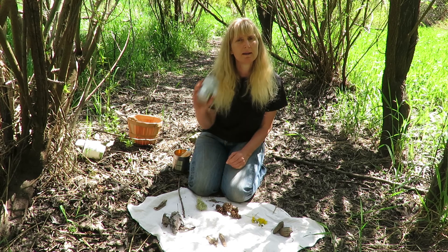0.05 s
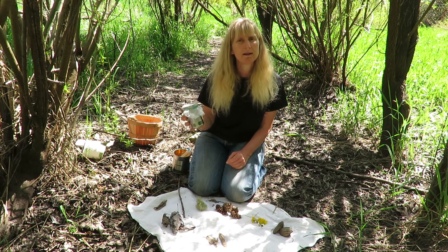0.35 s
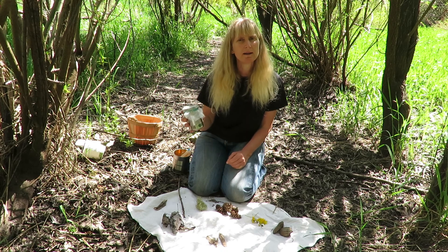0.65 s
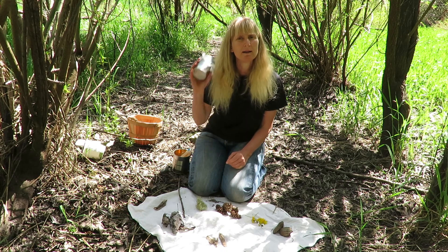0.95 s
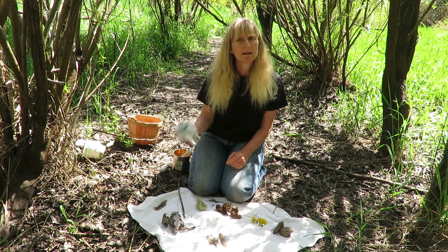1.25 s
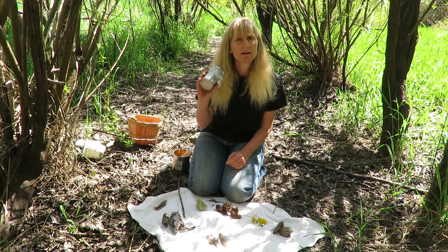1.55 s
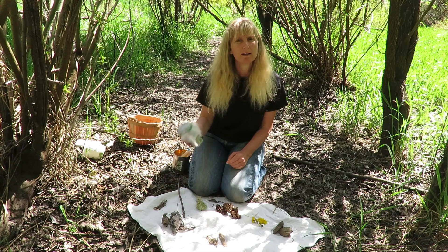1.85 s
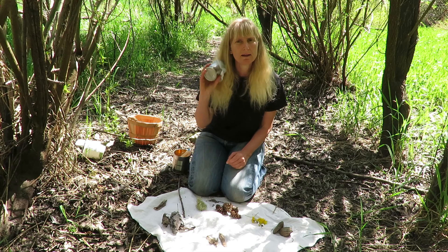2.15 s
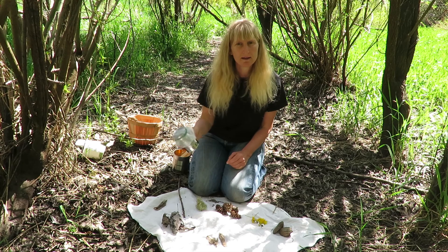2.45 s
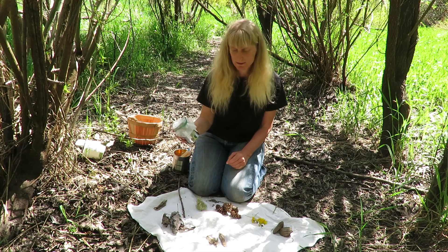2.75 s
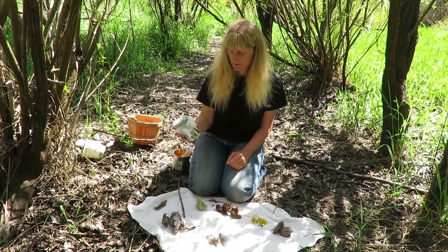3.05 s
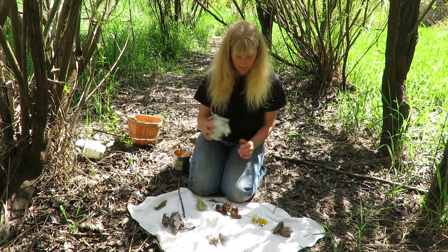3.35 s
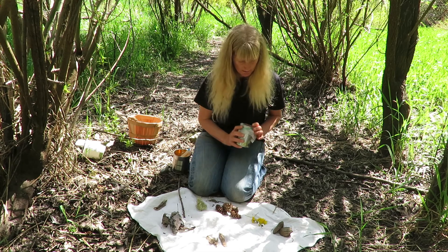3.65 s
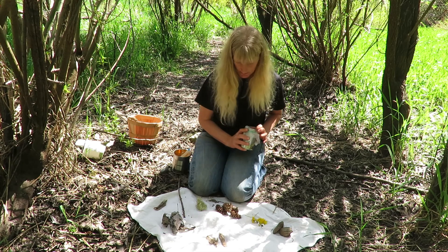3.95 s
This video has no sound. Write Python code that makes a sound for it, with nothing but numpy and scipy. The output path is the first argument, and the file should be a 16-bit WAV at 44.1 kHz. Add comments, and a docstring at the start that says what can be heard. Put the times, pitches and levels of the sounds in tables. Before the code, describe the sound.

Pebbles rattle in a small tin can, shaken four times with dry knocks and bright metallic clangs. After a short pause the can tips and they tumble softly. It sounds straight ahead, over faint outdoor air and insects.

```python
"""Faint outdoor air and insects sound throughout. From the start, a few pebbles are shaken four times
in a small tin can under trees: on each upstroke they slide and knock against the hand-damped lid, and
on each downstroke they hit the bare bottom, which clangs. Near 2.8 s the shaking stops. After a pause
the free hand takes hold of the can with a low bump, and from about 3.5 s the can is tipped, so the
pebbles tumble along its wall."""
import sys
import numpy as np
from scipy import signal
from scipy.fft import rfft, irfft, next_fast_len
from scipy.io import wavfile

SR = 44100
rng = np.random.default_rng(int(sys.argv[2]) if len(sys.argv) > 2 else 0)


def log_audio(samples):
    """Write samples as a 16-bit WAV file to the path given in sys.argv[1]."""
    # one column per channel
    frames = np.atleast_2d(samples).T
    # limit to full scale, then quantise
    limited = np.clip(frames, -1, 1)
    pcm = np.round(limited * 32767).astype(np.int16)
    wavfile.write(sys.argv[1], SR, pcm)


N = 176400
T = np.arange(SR // 3) / SR  # the clock of one hit [s]
# A "t60" or fade time is how long a sound takes to drop by 60 dB. Table levels are relative.
CLATTER_T60, BUZZ_T60, PING_T60 = 0.021, 0.046, 0.057
DETUNE, LIGHT_CHATTER = 0.0033, 0.14  # pitch spread between hits [fraction]; roughness of a tone


def amp(db):
    """Turn decibels into a gain."""
    return 10 ** (np.asarray(db) / 20)


def unit(x):
    """Scale a sound to an average power of 1."""
    return x / np.sqrt(np.mean(x ** 2) + 1e-20)


def struck(x):
    """Scale a hit so that its first 10 ms have a power of 1."""
    return x / np.sqrt(np.mean(x[:SR // 100] ** 2) + 1e-20)


def fade(t60):
    """The way a hit dies down."""
    return np.exp(-np.log(1000) * T / t60)


def along(points, hz):
    """Read between (frequency, value) points on a log frequency scale."""
    f, v = np.transpose(points)
    return np.interp(np.log(hz + 1), np.log(f + 1), v)


def add(track, start_s, x):
    """Mix a sound into a track."""
    i = max(0, round(start_s * SR))
    track[i:i + len(x)] += x[:max(0, N - i)]


def coloured(x, colour):
    """Give a sound a tone colour: some frequencies stronger, others weaker."""
    size = 2 * next_fast_len(N // 2 + SR // 4)
    gain = unit(amp(along(colour, np.fft.rfftfreq(size, 1 / SR))))
    cepstrum = irfft(np.log(gain))
    cepstrum[1:size // 2] *= 2  # folded forward, so nothing sounds before its hit
    cepstrum[size // 2 + 1:] = 0
    return irfft(rfft(x, size) * np.exp(rfft(cepstrum)), size)[..., :N]


def resonant(x, tones):
    """Let a sound set off ringing tones, each given as (pitch [Hz], width [Hz], level [dB])."""
    size = 2 * next_fast_len(N // 2 + SR // 4)
    f = np.fft.rfftfreq(size, 1 / SR)
    gain = sum((-1) ** k * amp(db) * 1j * f * width / (hz * hz - f * f + 1j * f * width)
               for k, (hz, width, db) in enumerate(tones))
    return irfft(rfft(x, size) * gain / np.sqrt(np.mean(np.abs(gain) ** 2)), size)[:N]


def ring(tones, detune=DETUNE, attack_s=0.00044, chatter=0.42):
    """Fading tones; where the pebbles lie shifts pitch and level, and their chatter adds roughness."""
    hz, db, t60 = np.transpose(tones)[:, :, None]
    shift, level, phase = rng.standard_normal((3, len(tones), 1))
    knots = np.arange(0, T[-1], 1 / 170)  # 170 wobbles a second
    jitter = np.array([np.interp(T, knots, row) for row in rng.standard_normal((len(tones), len(knots)))])
    phase = np.pi * phase + chatter * jitter * hz / 2060  # higher tones wobble more
    waves = amp(db + 6 * level) * fade(t60) * np.sin(2 * np.pi * hz * (1 + detune * shift) * T + phase)
    return struck(waves.sum(0) * (1 - np.exp(-T / attack_s)))


def bursts(times, levels_db, t60, tail_db=-6.5):
    """A puff of noise for each hit: a sharp tick, its fade and a short tail inside the can."""
    shape = amp(-6) * fade(0.015) + fade(t60) + amp(tail_db) * fade(0.15)
    out = np.zeros(N)
    for at, db in zip(times, levels_db):
        add(out, at, amp(db) * struck(rng.standard_normal(len(T)) * shape))
    return out


# Tone colour of the air (frequency [Hz], level [dB])
AIR_COLOUR = [(15, -47.5), (25, -19), (84, -6.5), (242, -14), (384, -8.5), (560, -12.5), (988, -16.5),
              (1520, -23), (3720, -31), (4740, -32.5), (7110, -39.5), (16000, -57)]
# How alike the air is in both ears (frequency [Hz], likeness [1 = the same])
AIR_LIKENESS = [(60, 1), (180, -0.05), (550, 0.28), (1650, 0.39), (4970, 0.11), (15000, 0.37)]
# Insect song (pitch [Hz], width [Hz], level [dB])
INSECT_BANDS = [(2880, 130, -18), (4194, 75, -18), (6400, 25, -28)]
# The recorder's automatic gain on the air and insects, as a set curve (time [s], level [dB])
RECORDER_GAIN = [(0, -52), (.42, -48.5), (.55, -52), (1.1, -46.5), (1.5, -53.5), (1.9, -50.5), (2.1, -53.5),
                 (2.5, -45), (2.85, -52.5), (3.4, -48.5), (3.95, -43)]
def outdoors():
    """Steady air and insect song; the recorder's gain dips them after loud hits, then lets them rise."""
    hz = np.fft.rfftfreq(N, 1 / SR)
    noise = lambda gain: irfft(rfft(rng.standard_normal((2, N))) * gain, N)
    spread = np.arccos(np.clip(along(AIR_LIKENESS, hz), -1, 1)) / 2
    mid, side = noise(amp(along(AIR_COLOUR, hz)) * np.array([np.cos(spread), np.sin(spread)]))
    air = unit(np.array([mid + side, mid - side]))
    insects = sum(amp(db) * unit(noise(1 / (1 + ((hz - pitch) / width) ** 2)))
                  for pitch, width, db in INSECT_BANDS)
    return (air + insects) * amp(np.interp(np.arange(N) / SR, *np.transpose(RECORDER_GAIN)))


def hand_bump():
    """The free hand takes hold of the can with a low bump."""
    at, hz, db, t60 = 3.455, 92.4, -36.5, 0.081
    out = np.zeros(N)
    add(out, at, amp(db) * ring([(hz, 0, t60)], attack_s=0.0032))
    return out


# Sound thrown back by ground and bushes (frequency [Hz], level [dB])
SCATTER_COLOUR = [(100, -17), (500, -42), (1200, -55.5), (2100, -23.5), (4000, -13.5), (8000, -7.5),
                  (13000, -2.5)]
def among_trees(can, echo_db=-45.5, echo_t60=0.69):
    """Ground and bushes make the can differ between the ears; the trees add a faint echo."""
    hz, _, spectrum = signal.stft(can, SR, nperseg=128)
    scramble = np.exp(2j * np.pi * rng.random(spectrum.shape))
    side = signal.istft(spectrum * amp(along(SCATTER_COLOUR, hz))[:, None] * scramble, SR)[1][:N]
    tail = rng.standard_normal((2, len(T))) * fade(echo_t60)
    echo = signal.fftconvolve(can[None], tail / np.linalg.norm(tail[0]), axes=1)[:, :N]
    return np.array([can + side, can - side]) + amp(echo_db) * echo


# Tone colour of stone striking tin (frequency [Hz], level [dB])
CRACK_COLOUR = [(100, -39), (700, -21.5), (1500, 4), (2800, 4), (4800, 1), (7400, -9), (9500, -8),
                (13000, -16.5), (15000, -25), (16500, -48)]
def cracks(times, levels_db):
    """The sharp, bright noise as each pebble lands."""
    return coloured(bursts(times, levels_db, t60=0.036, tail_db=-9), CRACK_COLOUR)


# The high tones of the can's bottom (pitch [Hz], width [Hz], level [dB])
HIGH_TONES = [(2759, 54.5, 2.5), (3264, 74, -5), (3756, 49, 0), (4230, 32, -6), (4350, 140, -5),
              (4620, 41, -0.5), (6360, 95, -5.5), (6710, 45, -6), (6810, 80, -9.5), (8730, 110, -12.5),
              (9230, 45, -12), (9490, 43, -10.5), (10166, 90, -11), (10460, 140, -17), (11180, 180, -15),
              (12700, 220, -25), (13400, 130, -21.5), (14640, 41, -19.5)]
def rubbed_tin(x):
    """The high tones when rubbed from the side: a little narrower, and duller by 3 dB an octave."""
    lowest_hz = HIGH_TONES[0][0]
    tones = [(hz, 0.81 * width, db - 3 * np.log2(hz / lowest_hz)) for hz, width, db in HIGH_TONES]
    return resonant(x, tones)


def scrape(strokes, grains_per_s=750, spread_db=4):
    """Many tiny touches that swell quickly and die away as the pebbles travel."""
    t = np.arange(N) / SR
    level = sum(amp(db) * np.interp(t, at + length * np.array([0, 0.11, 1]), [0, 1, 0]) ** 0.56
                for at, length, db in strokes)
    touches = rng.random(N) < grains_per_s / SR
    grains = touches * amp(spread_db * np.clip(rng.standard_normal(N), -2, 2))
    power = np.abs(signal.fftconvolve(grains ** 2, fade(0.0032))[:N])
    return unit(np.sqrt(power) * rng.standard_normal(N)) * level


# The tones of the can's wall (pitch [Hz], width [Hz], level [dB])
WALL_TONES = [(970, 160, -6.5), (1269, 90, 0), (1590, 140, -2), (1770, 80, -2), (2085, 61, 2.5),
              (2187, 91, -1.5), (2850, 26, -2.5)]
# Pebbles roll round the rim (time [s], length [s], level [dB])
RIM_ROLLS = [(.43, 0.25, -32), (.58, 0.6, -49), (1.445, 0.096, -46), (2.0, 0.11, -32), (2.618, 0.12, -27),
             (3.605, 0.19, -23.5)]
def rolling():
    """Rolling pebbles sound mostly through the wall."""
    grit = scrape(RIM_ROLLS)
    wall = amp(-0.5) * resonant(grit, WALL_TONES)
    return wall + amp(-18.5) * rubbed_tin(grit) + amp(-10.5) * coloured(grit, CRACK_COLOUR)


# The two strong tones of the can's bottom (pitch [Hz], fade time [s])
STRONG_TONES = [(1245, 0.12), (2060, 0.12)]
# Tone colour of sliding (frequency [Hz], level [dB])
SLIDE_COLOUR = [(100, -21.5), (300, -14.5), (440, 1.5), (736, -11.5), (872, -6.5), (1360, 0), (2040, -5.5),
                (2320, -5), (2860, -7), (6290, -18.5), (7290, -28.5), (13000, -28), (16000, -53)]
# Pebbles slide through the can (time [s], length [s], level [dB])
PEBBLE_SLIDES = [(0, 0.25, -35), (0.206, 0.071, -26), (0.261, 0.084, -34), (1.022, 0.37, -48),
                 (1.147, 0.17, -33.5), (1.328, 0.14, -20.5), (1.74, 0.08, -30.5), (1.85, 0.16, -28),
                 (2.19, 0.041, -41.5), (2.432, 0.11, -26.5), (3.541, 0.39, -39)]
def sliding():
    """Sliding pebbles make a gritty rush that keeps the tin singing."""
    grit = scrape(PEBBLE_SLIDES)
    rush = amp(-3) * coloured(grit, SLIDE_COLOUR)
    tin = amp(-19.5) * resonant(grit, WALL_TONES) + amp(-14) * rubbed_tin(grit)
    singing = [(hz, np.log(1000) / (np.pi * t60), -6 * np.log2(hz / STRONG_TONES[0][0]))
               for hz, t60 in STRONG_TONES]
    return rush + tin + amp(-7.5) * resonant(grit, singing)


# Tone colour of clatter on bare tin (frequency [Hz], level [dB])
TIN_COLOUR = [(100, -36), (500, 0), (950, -9), (1600, 6), (3000, -12.5), (6000, -15), (16000, -30.5)]
# Pebbles hit the wall (time [s], level [dB])
WALL_HITS = [(0.798, -35.5), (0.837, -26.5), (2.141, -24.5), (3.593, -25.5), (3.616, -13), (3.624, -9.5),
             (3.638, -1), (3.662, -12.5), (3.686, -7), (3.693, -9), (3.705, -9.5), (3.722, -10.5),
             (3.733, -9), (3.76, -13.5), (3.805, -18.5), (3.818, -14.5), (3.869, -20), (3.886, -37.5)]
def wall_tumbles():
    """Pebbles tumble along the side of the can, whose ring the hands damp to short clinks."""
    times, level = np.transpose(WALL_HITS)
    out = cracks(times, level - 44.5)
    out += coloured(bursts(times, level - 24.5, CLATTER_T60), TIN_COLOUR)
    clink = [(hz, db, np.log(1000) / (np.pi * width)) for hz, width, db in WALL_TONES]
    for at, db in WALL_HITS:
        add(out, at, amp(db - 18) * ring(clink, detune=0.012))
    return out + rubbed_tin(bursts(times, level - 18.5, CLATTER_T60))


# The tones of the pushed lid (pitch [Hz], level [dB], fade time [s])
THUMP_TONES = [(128.8, -9.5, 0.055), (211.3, -8, .045), (400, 1.5, 0.017), (490, 4.5, 0.051),
               (576, 3.5, 0.04), (890, -8, 0.013)]
# Pushes on the lid (time [s], level [dB])
LID_PUSHES = [(0.101, -27.5), (.113, -24.5), (1.726, -28.5), (1.745, -25.5), (2.296, -22)]
def lid_thumps():
    """All the pebbles push into the lid at once, with a deep thump."""
    out = np.zeros(N)
    for at, db in LID_PUSHES:
        add(out, at, amp(db) * ring(THUMP_TONES, detune=0.062, attack_s=0.0033))
    return out


# The tones of the knocked lid (pitch [Hz], level [dB], fade time [s])
LID_TONES = [(416, -5, 0.075), (440, 3.5, 0.075), (500, 1, 0.065), (610, -6, 0.055), (700, -4.5, 0.035),
             (862, 0.5, .042)]
# The long, bright ring of the can's shell (pitch [Hz], level [dB], fade time [s])
SHELL_TONES = [(3793, -20, 0.3), (6580, -23, 0.17)]
# Tone colour of clatter on the lid (frequency [Hz], level [dB])
LID_COLOUR = [(60, -34.5), (300, -14.5), (450, 11), (700, -3.5), (1050, 0.5), (1300, 4.5), (1750, 7),
              (2600, -2.5), (4000, -8.5), (8000, -24), (16000, -49)]
# Pebbles hit the lid (time [s], crack [dB], thud [dB], clatter [dB])
LID_HITS = [(0.079, -13.5, -53, -25), (0.098, -14, -23, -19.5), (0.207, -6.5, -32.5, -27),
            (0.227, -2.5, -21, -18.5), (0.24, -0.5, -23.5, -21), (0.276, -20, -29, -26),
            (0.29, -17.5, -48, -21), (0.332, -20.5, -45, -22.5), (0.3682, -11, -27, -24),
            (1.111, -18, -35, -35), (1.153, -3, -26.5, -18.5), (1.181, -2.5, -26, -20.5),
            (1.193, -2, -29.5, -14.5), (1.202, 0, -15, -32.5), (1.216, -5.5, -28.5, -18),
            (1.263, -24.5, -30, -25.5), (1.273, -16, -31.5, -16), (1.322, -14.5, -25, -20),
            (1.341, -2, -31, -10), (1.353, -12.5, -12, -16), (1.372, -2, -23, -18.5),
            (1.38, -4, -28.5, -11.5), (1.419, -2.5, -32, -13.5), (1.657, -28.5, -55, -31.5),
            (1.701, -21.5, -47, -38.5), (1.722, -24.5, -30, -31), (1.76, -9.5, -26.5, -25),
            (1.773, -17, -28.5, -27), (1.855, -9, -26, -19), (1.872, -0.5, -18.5, -17.5),
            (1.896, -5, -26, -23), (1.905, -5, -36, -20.5), (1.92, -6.5, -31, -19.5),
            (1.95, -18.5, -29, -27.5), (2.243, -16.5, -67, -41), (2.278, -15, -45, -32.5),
            (2.296, -14, -25, -19.5), (2.316, -12, -26, -29.5), (2.344, -20, -40, -26),
            (2.36, -11, -27, -24.5), (2.451, -16, -20.5, -12), (2.466, -9.5, -26.5, -13.5),
            (2.497, -22, -26, -20), (2.515, -4.5, -53, -17), (2.538, -17.5, -36, -28),
            (2.598, -22.5, -37, -23.5)]
def lid_knocks():
    """The hand-damped lid knocks dryly: a crack, clatter, a low thud and a trace of ringing tin."""
    times, crack, _, clatter = np.transpose(LID_HITS)
    out = cracks(times, crack - 23)
    out += coloured(bursts(times, clatter - 7.5, CLATTER_T60), LID_COLOUR)
    tin = [(hz, 0, t60) for hz, t60 in STRONG_TONES] + SHELL_TONES
    for at, _, thud_db, clatter_db in LID_HITS:
        add(out, at, amp(thud_db - 4.5) * ring(LID_TONES, detune=0.056, attack_s=0.0028))
        add(out, at, amp(clatter_db - 16) * ring(tin, chatter=LIGHT_CHATTER))
    return out


# Pebbles land near the rim (time [s], level [dB])
RIM_HITS = [(0.489, -29), (1.442, -26), (2.73, -20.5)]
def rim_pings():
    """Hits near the rim bring out the lowest of the bottom's high tones."""
    out = np.zeros(N)
    for at, db in RIM_HITS:
        add(out, at, amp(db) * ring([(HIGH_TONES[0][0], 0, PING_T60)], chatter=LIGHT_CHATTER))
    return out


# Settling pebbles stiffen the bottom and raise its strong tones (time [s], pitch [ratio])
PITCH_LIFT = [(0.52, 1), (0.77, 1.04), (1.1, 1)]
# Pebbles hit the bottom (time [s], crack [dB], first tone [dB], second tone [dB], high tones [dB])
BOTTOM_HITS = [(0.4325, -20, -33, -45.5, -22.5), (0.437, -8, -14, -49, -41.5),
               (0.4479, -22, -9.5, -17.5, -27.5), (0.4868, -4.5, -13, -9.5, -19.5),
               (0.4974, -18, -11, -10, -33.5), (0.524, -32, -29, -25, -37),
               (0.5443, -22.5, -19, -12.5, -29), (0.563, -44, -19, -26, -34),
               (0.5867, -32, -20, -17.5, -36.5), (0.6106, -46, -25, -28, -44),
               (0.6334, -35, -28.5, -27.5, -46.5), (0.6975, -27, -36, -34.5, -39.5),
               (0.7314, -26, -25.5, -19.5, -33.5), (0.7675, -28, -39.5, -32, -61),
               (1.4427, 4, -10, -4.5, -11), (1.4694, -27.5, -20.5, -7.5, -20),
               (1.4863, -15.5, -16, -19, -23), (1.5073, -18, -9.5, -11, -22),
               (1.5238, -15.5, -8, -21, -23.5), (1.5658, -22.5, -18.5, -26, -32),
               (1.9997, -8, -17, -9.5, -14), (2.0208, -8, -12, -5, -15), (2.0382, -15, -10, -14.5, -36.5),
               (2.0521, -16, -10, -17, -38), (2.0918, -21.5, -17.5, -35, -36), (2.6176, -10, -45, -33, -17),
               (2.653, -0.5, -16.5, -6, -15), (2.729, -4, -24.5, -17, -26), (2.7816, -25, -34, -35, -41)]
def bottom_clangs(choke_s=0.0038):
    """Each hit stops and restarts the two strong tones, buzzes the high ones and rings the shell."""
    times, crack, _, _, high = np.transpose(BOTTOM_HITS)
    out = cracks(times, crack - 22.5)
    out += coloured(bursts(times, high - 8.5, CLATTER_T60), TIN_COLOUR)
    out += resonant(bursts(times, high - 2.5, BUZZ_T60), HIGH_TONES)
    gaps = np.diff(times, append=N / SR)
    for (at, _, first_db, second_db, high_db), gap in zip(BOTTOM_HITS, gaps):
        choke = np.clip(1 - (T - gap) / choke_s, 0, 1)  # falls to zero at the next hit
        lift = np.interp(at, *np.transpose(PITCH_LIFT))
        for (hz, t60), db in zip(STRONG_TONES, (first_db - 4.5, second_db - 7)):
            clang = ring([(hz * lift, 0, t60)], attack_s=0.00094, chatter=LIGHT_CHATTER)
            add(out, at, amp(db) * choke * clang)
        for hz, db, t60 in SHELL_TONES:
            shell = ring([(hz, 0, t60)], DETUNE / 2, chatter=LIGHT_CHATTER)
            add(out, at, amp((first_db + high_db) / 2 + db) * shell)
    return out


def scene():
    """The can straight ahead, with the outdoors behind it."""
    hits = lid_knocks() + lid_thumps() + bottom_clangs() + rim_pings() + wall_tumbles()
    can = hits + rolling() + sliding()
    return among_trees(can) + outdoors() + hand_bump()


def record(dry):
    """Round off the loudest peaks and remove everything above 16400 Hz."""
    rounded = dry / (1 + np.abs(dry) ** 6) ** (1 / 6)
    passband = np.fft.rfftfreq(2 * N, 1 / SR) < 16400
    return irfft(rfft(rounded, 2 * N) * passband)[:, :N]


dry = scene()
out = record(dry)
log_audio(out)
```